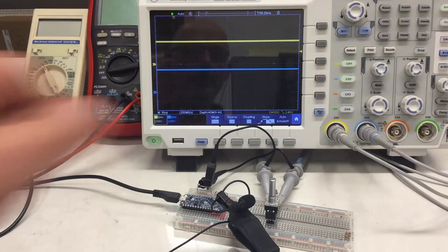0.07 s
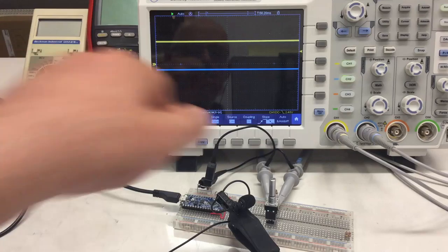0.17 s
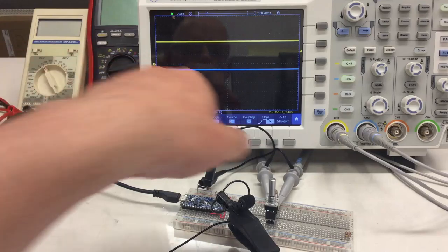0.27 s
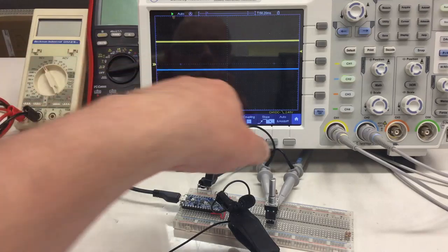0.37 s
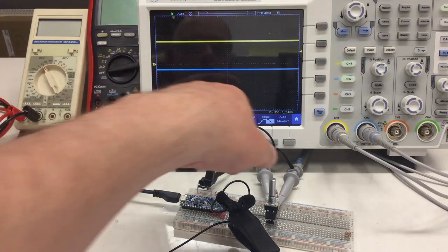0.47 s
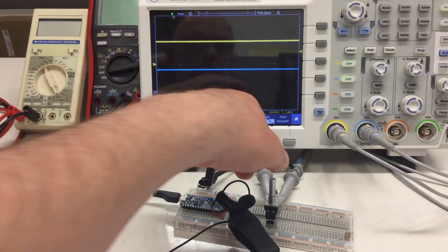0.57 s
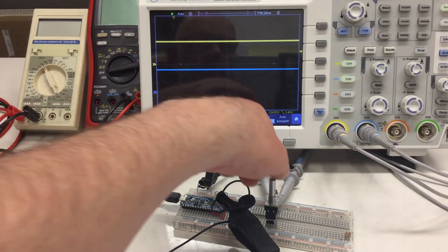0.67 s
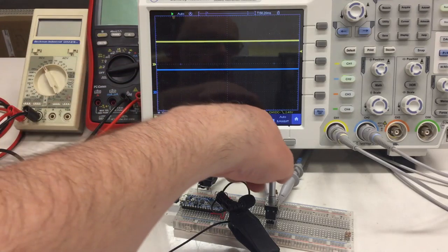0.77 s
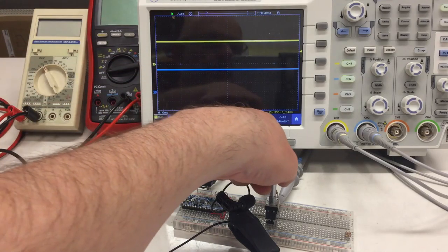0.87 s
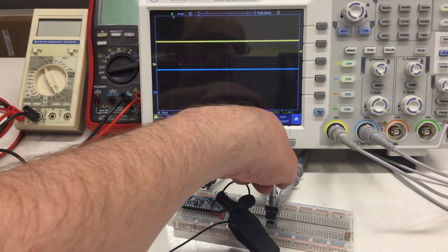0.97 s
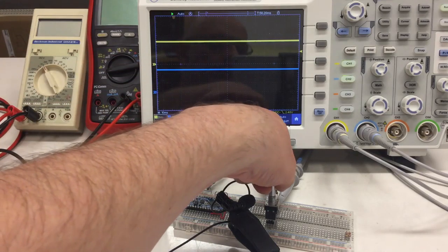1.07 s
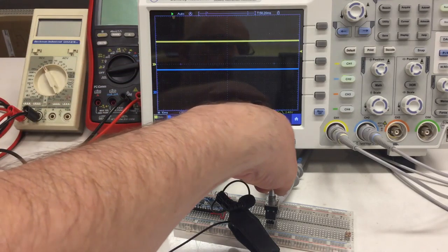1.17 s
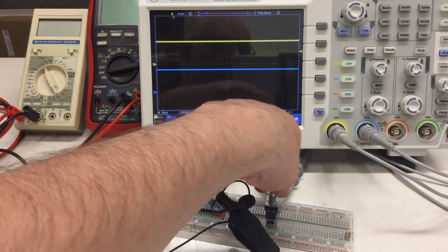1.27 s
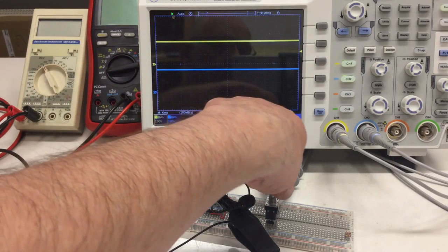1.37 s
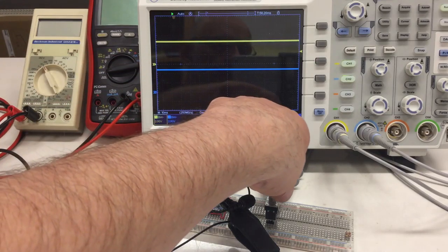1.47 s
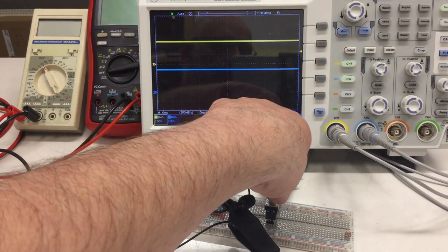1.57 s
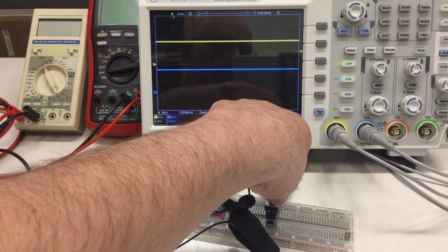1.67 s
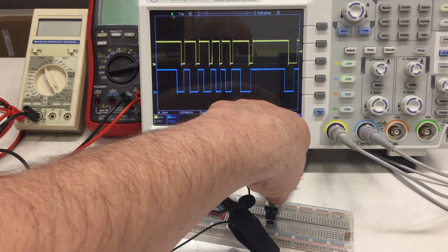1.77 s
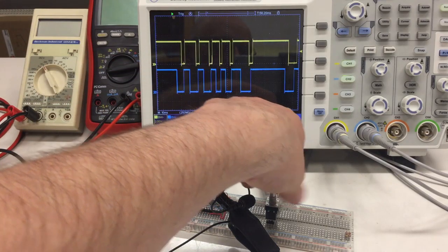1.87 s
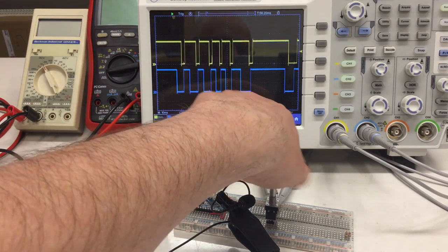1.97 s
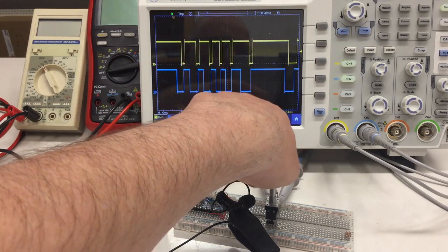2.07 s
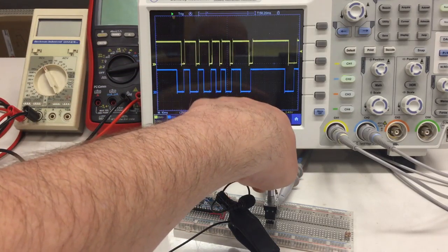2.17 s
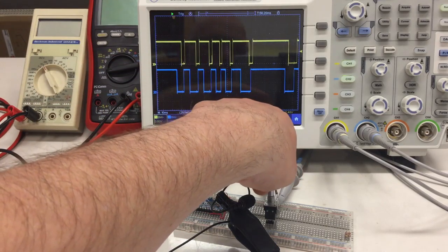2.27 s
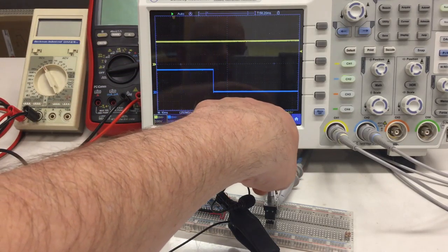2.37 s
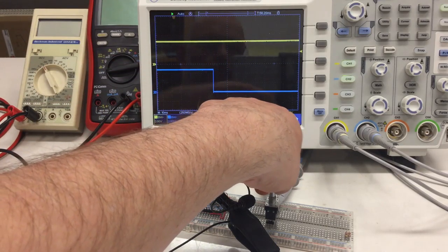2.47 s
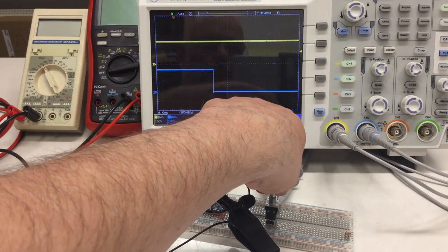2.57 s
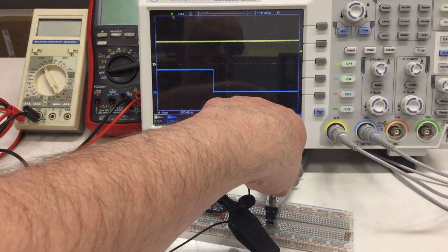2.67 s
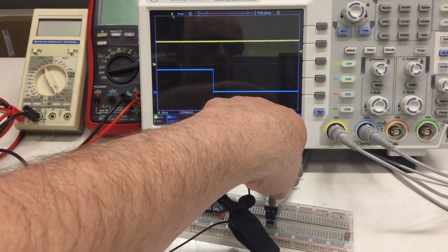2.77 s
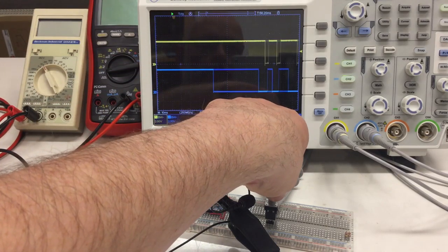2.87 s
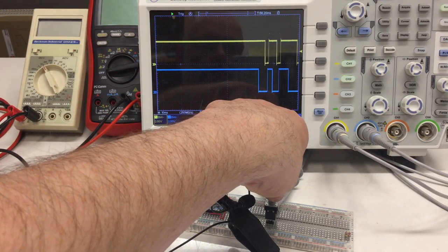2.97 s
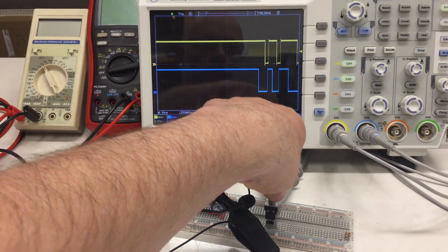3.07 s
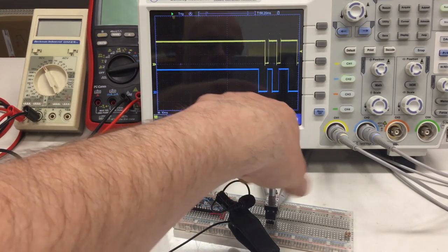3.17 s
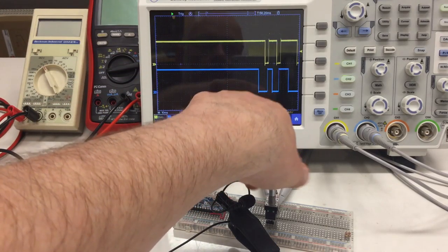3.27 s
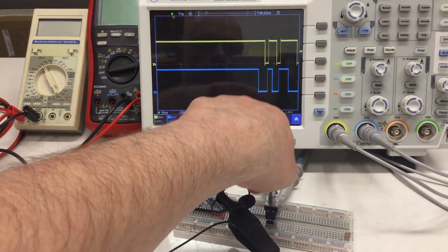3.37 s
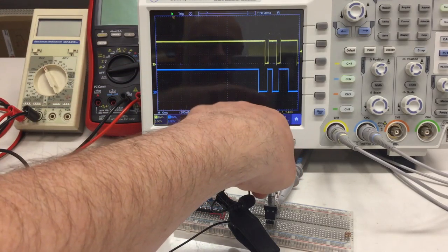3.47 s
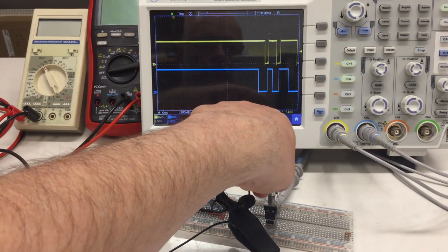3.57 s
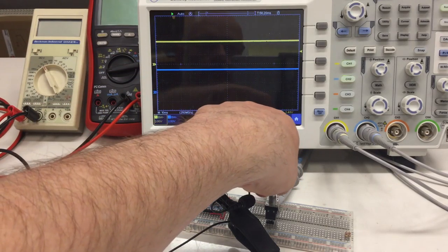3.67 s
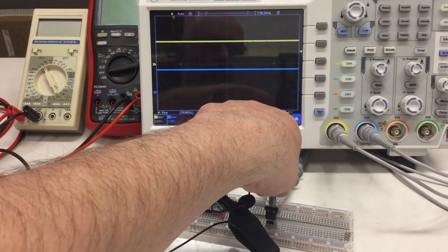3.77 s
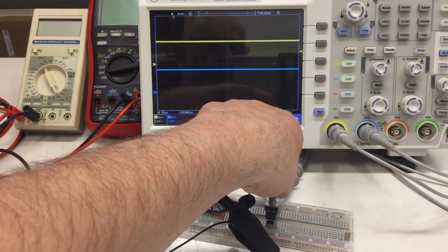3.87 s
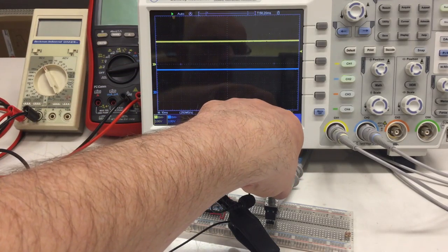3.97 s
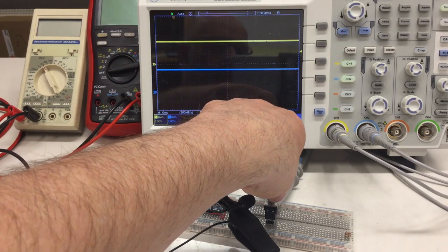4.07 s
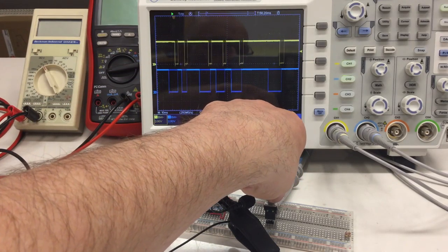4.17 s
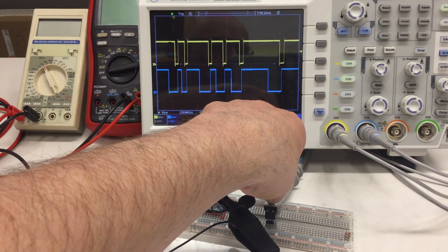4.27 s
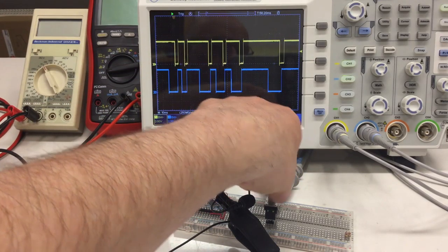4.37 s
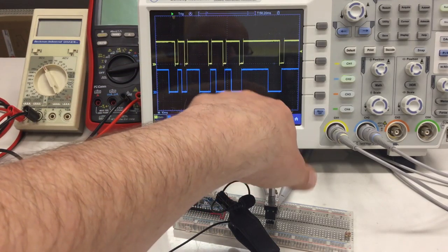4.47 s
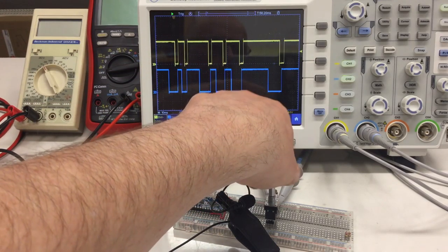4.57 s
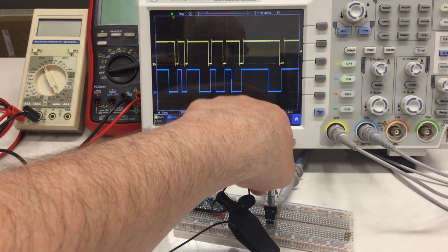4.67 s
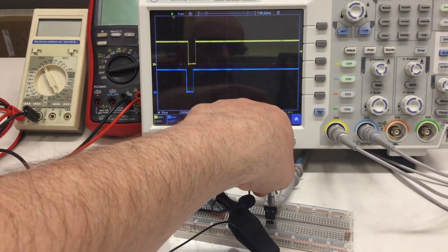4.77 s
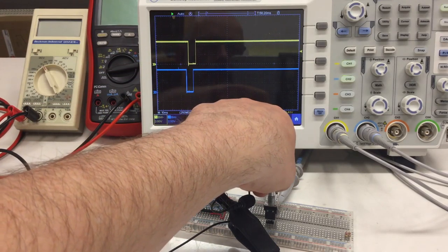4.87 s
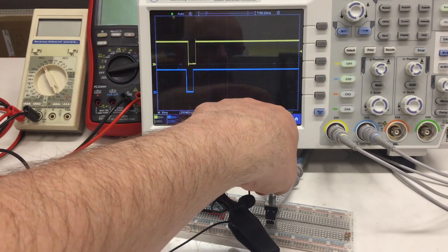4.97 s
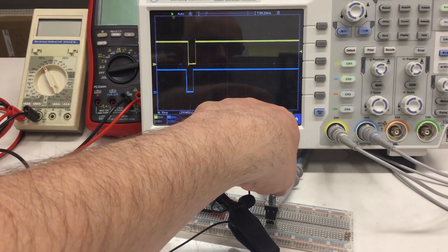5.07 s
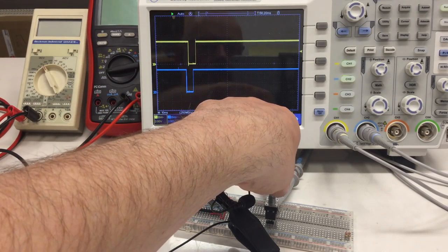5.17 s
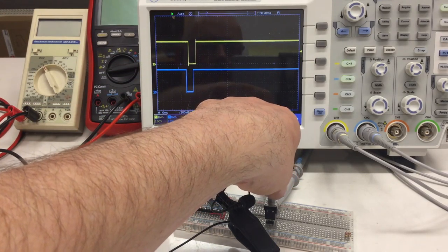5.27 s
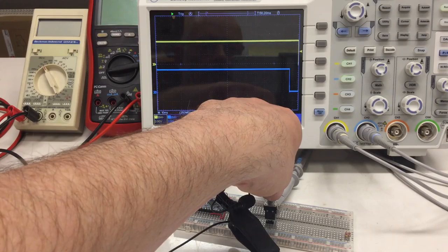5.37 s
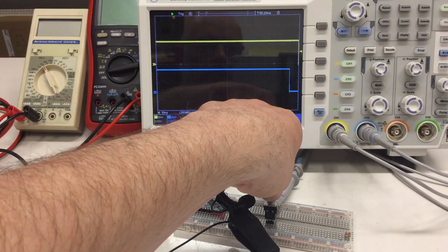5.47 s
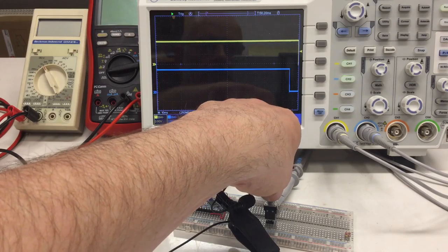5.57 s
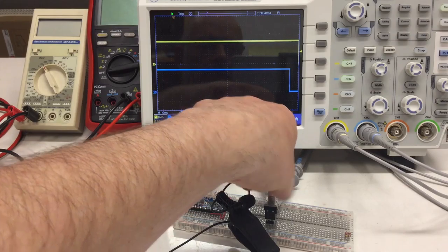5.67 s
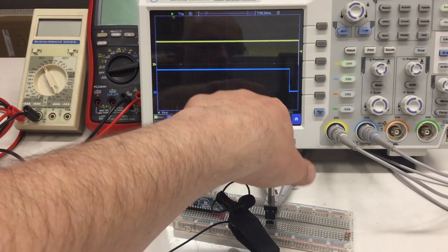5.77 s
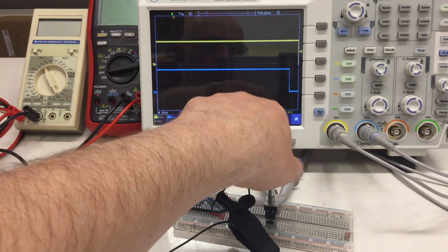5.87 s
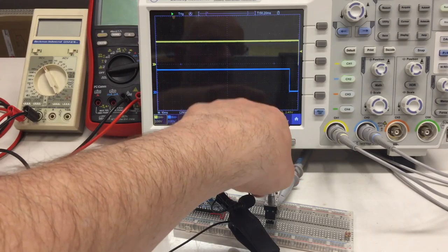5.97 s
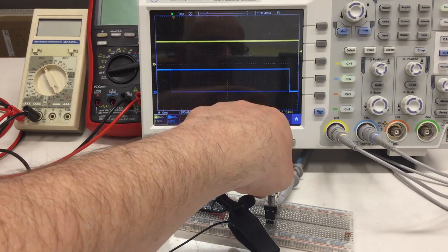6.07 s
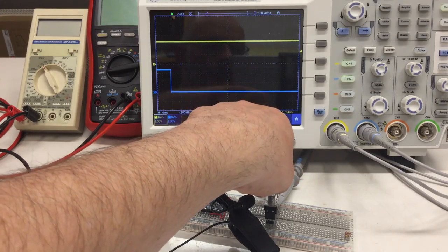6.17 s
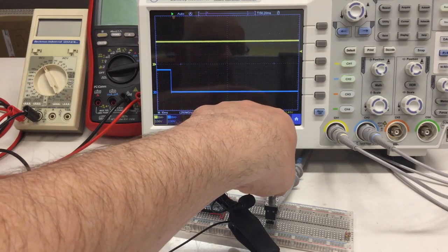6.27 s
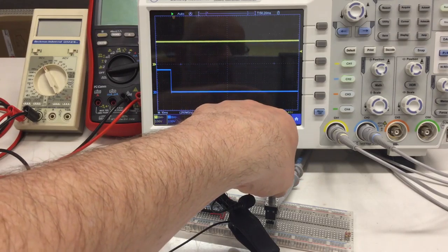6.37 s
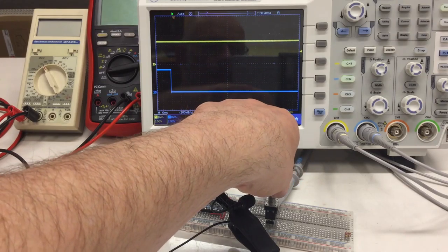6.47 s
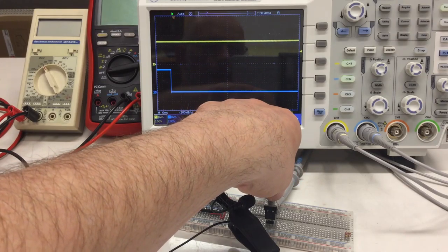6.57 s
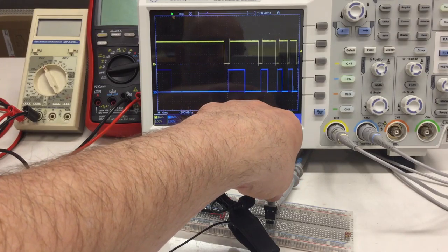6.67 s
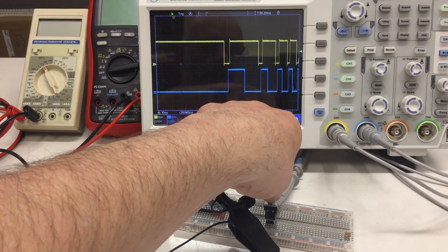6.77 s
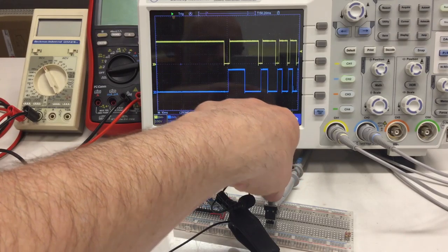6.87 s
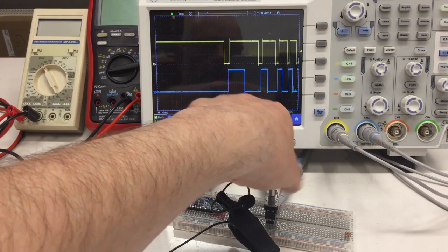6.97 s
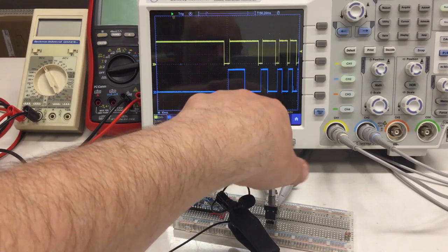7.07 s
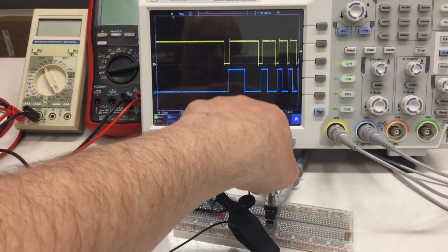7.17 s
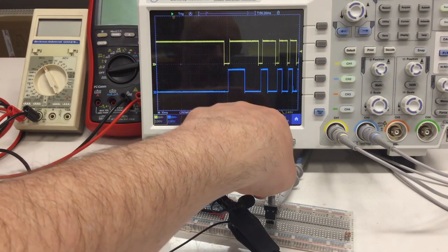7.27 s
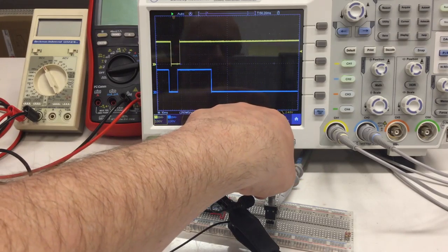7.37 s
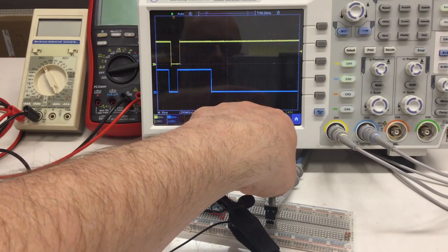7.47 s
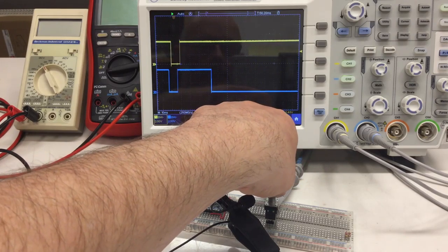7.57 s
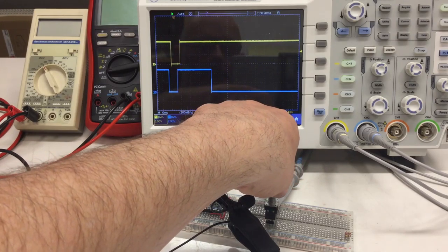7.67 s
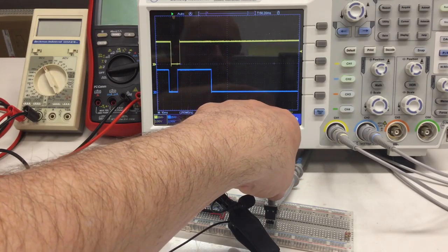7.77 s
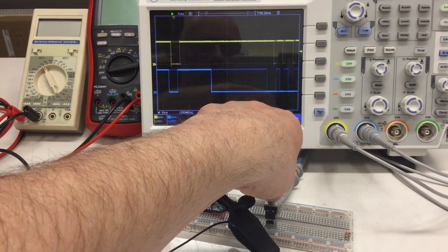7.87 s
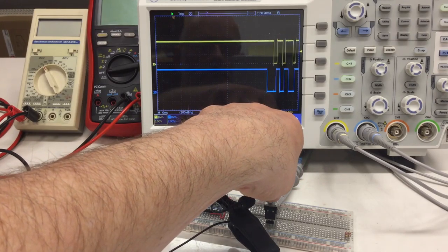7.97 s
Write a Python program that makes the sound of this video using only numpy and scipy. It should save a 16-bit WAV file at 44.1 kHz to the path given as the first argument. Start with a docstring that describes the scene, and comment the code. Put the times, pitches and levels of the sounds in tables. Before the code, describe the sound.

Close up on a workbench, a faint fan hum and hiss are heard alone for about a second. Then fingers turn a small rotary knob again and again, its crisp plastic clicks gathering into fast ratcheting runs and thinning to single ticks, with short pauses between. The microphone shares the bench and picks up small jolts, soft finger bumps and a slight low rumble from the hand.

```python
"""A small detented knob on a breadboard, twisted by hand; the microphone shares the bench.
At each detent a spring snaps into its notch: a short plastic click and a jolt of the bench.
Fingers land, rub and let go, and the tremor of the hand adds a low rumble.
Behind it, an instrument fan whines over mains hum and room hiss."""
import sys
import numpy as np
from scipy import signal
from scipy.fft import rfft, irfft
from scipy.io import wavfile
from scipy.ndimage import uniform_filter1d

SR = 44100
rng = np.random.default_rng(int(sys.argv[2]) if len(sys.argv) > 2 else 0)


def bounce(signal):
    """Save signal as a 16-bit WAV file at the path given by the first command-line argument."""
    frames = np.transpose(np.atleast_2d(signal))
    limited = np.clip(frames, -1, 1)
    pcm = np.round(limited * 32767).astype(np.int16)
    wavfile.write(sys.argv[1], SR, pcm)


N = 353726

# detent snaps: time_s, click_db (relative)
DETENTS = [(1.148, -20.5), (1.164, -24.5), (1.1773, -20.5), (1.188, -21), (1.2, -26.0), (1.2214, -30.5),
           (1.268, -28.5), (1.313, -26), (1.359, -23), (1.4007, -23.5), (1.4355, -26.0), (1.4624, -22.5),
           (1.4815, -26.0), (1.496, -20.5), (1.5098, -19), (1.5237, -19), (1.533, -21.5), (1.5415, -15),
           (1.5475, -12), (1.5523, -12), (1.5587, -19.5), (1.597, -20), (1.695, -22), (1.8834, -28.5),
           (2.4102, -21), (2.4224, -23.5), (2.4427, -27), (2.4522, -20.5), (2.4622, -23), (2.4741, -27),
           (2.4936, -26.5), (2.5989, -31), (2.6588, -30.0), (2.711, -30.5), (2.7626, -26.5),
           (2.7952, -19.5), (2.8045, -18.5), (2.8095, -11), (2.814, -10.0), (2.8178, -9.5), (2.8219, -14),
           (2.8252, -14.0), (2.8273, -11), (2.8304, -8.5), (2.8342, -14.5), (2.8593, -21.5), (2.969, -23),
           (3.613, -21.5), (3.6237, -21.5), (3.6491, -24), (3.6647, -22.5), (3.6821, -27), (3.725, -29),
           (3.7691, -22.5), (3.8017, -25), (3.857, -24.5), (3.9001, -22.5), (3.9369, -22), (3.9751, -22.5),
           (4.0163, -19), (4.0313, -24), (4.0402, -17.5), (4.0464, -19), (4.0513, -15.5), (4.0582, -16.5),
           (4.066, -16), (4.0756, -19), (4.0852, -21.5), (4.1023, -19), (4.151, -22), (4.222, -21.5),
           (4.917, -21), (4.9298, -23), (4.9484, -23.5), (4.9575, -23), (4.9663, -20.5), (4.975, -23),
           (4.9901, -25.5), (5.0488, -33.5), (5.1213, -24), (5.169, -19.0), (5.2163, -24.5),
           (5.2543, -22.5), (5.2878, -16.5), (5.298, -19), (5.305, -15), (5.3102, -12), (5.3161, -18.5),
           (5.323, -22), (5.3328, -23), (5.3448, -13), (5.3549, -21), (5.371, -15.5), (5.4039, -18),
           (5.469, -21), (6.1638, -23), (6.1981, -23.0), (6.2157, -26), (6.227, -20), (6.2362, -25),
           (6.248, -24), (6.2674, -22.5), (6.302, -26), (6.375, -25), (6.4179, -18.5), (6.472, -22.5),
           (6.5129, -20), (6.5445, -18.5), (6.558, -18), (6.565, -18), (6.571, -14), (6.5772, -15),
           (6.5847, -20), (6.5948, -23), (6.6044, -16), (6.614, -28), (6.6287, -19.0), (6.662, -20.5),
           (6.739, -22), (6.933, -30.0), (7.4287, -20.5), (7.4367, -21), (7.448, -24.5), (7.461, -18.5),
           (7.469, -21.5), (7.4781, -20.5), (7.491, -22), (7.5266, -27.5), (7.601, -24), (7.6589, -22),
           (7.702, -23.0), (7.7305, -19), (7.7485, -16.5), (7.7578, -14), (7.7642, -13), (7.771, -10.5),
           (7.7819, -15.5), (7.7969, -15.0), (7.8208, -19.5), (7.8553, -19), (7.8836, -21.5),
           (7.9105, -20.5), (7.9377, -20.5), (7.9794, -22)]


def clicks(detents):
    """The spring scrapes over the crest, drops in and rings the knob; a hard landing adds a dry crack."""
    # knob modes: freq_hz, level_db, t60_s
    knob_modes = [(2970, -8.5, 0.0054), (3520, -6.5, 0.0012), (3670, 6, 0.0043), (4440, -1, 0.0028),
                  (5250, 0.5, 0.0056), (6050, -3, 0.0042), (7600, -7, 0.0025)]
    lead_s, tilt_per_octave, neutral_crack_db = .002, 0.34, -19.5
    out, t = np.zeros(N), np.arange(int(.02 * SR)) / SR
    hit = int(lead_s * SR)
    plastic = signal.butter(2, [2200, 8000], "band", fs=SR, output="sos")
    treble = signal.butter(1, [4000, 15000], "band", fs=SR, output="sos")
    scrape_env = np.exp(-np.abs(t - lead_s) / np.where(t < lead_s, .0006, .0009))
    for time_s, click_db, crack_db, *_ in detents:
        blow = 0.33 * rng.standard_normal(len(t)) * scrape_env
        blow[hit] += 1
        modes = np.array(knob_modes)
        octaves = np.log2(modes[:, 0] / modes[0, 0])
        modes[:, 1] += tilt_per_octave * (crack_db - neutral_crack_db) * octaves  # harder is brighter
        knob = ring(modes, t, spread_db=1.5, detune=.012)
        body = signal.sosfilt(plastic, signal.fftconvolve(blow, knob)[:len(t)])
        landing = .15 * rng.standard_normal(len(t)) * np.exp(-np.abs(t - lead_s) / .0005)
        landing[hit] -= 1
        crack = signal.sosfilt(treble, signal.sosfilt(treble, landing))
        snap = body / np.linalg.norm(body) + amp(crack_db) * crack / np.linalg.norm(crack)
        add(out, time_s - lead_s, amp(click_db + 11) * snap / np.linalg.norm(snap))
    return out


def twists():
    """The hand pushes, then brakes; knob speed sets each detent's crack, signed jolt and rebound."""
    # twists: start_s, brake_s, push_gain, brake_gain, rebound_gain, half_force_gap_s, crack_offset_db
    turns = [(1.14, 1.24, 0.064, .1, 0.24, 0.021, 3), (1.25, 1.537, 0.094, .17, 0.21, 0.026, 6),
             (2.4, 2.54, 0.077, .1, 0.11, .03, 9), (2.55, 2.807, 0.063, .15, 0.24, 0.031, 4),
             (3.6, 3.74, 0.13, .1, 0.25, 0.033, 7), (3.75, 4.038, 0.095, 0.2, 0.13, 0.03, 2.5),
             (4.9, 5.08, 0.14, .1, 0.15, 0.023, 4), (5.1, 5.302, 0.087, 0.22, 0.21, 0.035, 4.5),
             (6.15, 6.33, 0.14, .1, 0.15, 0.038, 3), (6.35, 6.557, 0.082, 0.2, .19, 0.032, 2.5),
             (7.42, 7.55, 0.13, .1, 0.21, 0.026, 8.5), (7.62, 7.761, 0.16, .24, 0.21, 0.029, 1.5)]
    turnover_s, hurried_gap_s = 0.019, 0.0056
    pushing_db, fade_db_per_octave, onset_detents = -19.5, 11, 1.37
    time_s, click_db = np.transpose(DETENTS)
    turns = np.array(turns)
    turn_index = np.maximum(np.searchsorted(turns[:, 0], time_s) - 1, 0)
    _, brake_s, push_gain, brake_gain, rebound_gain, half_gap_s, offset_db = turns[turn_index].T
    before_s, after_s = np.diff(time_s, prepend=0), np.diff(time_s, append=N / SR)
    gap_s, braking = np.minimum(before_s, after_s), time_s > brake_s
    force = 1 / (1 + (gap_s / half_gap_s) ** 3.3)
    scatter = rng.standard_normal((len(time_s), 3)).T
    # the crack grows over the first braked detents and fades as the knob slows
    braked_count = np.maximum(np.arange(len(time_s)) + 1 - np.searchsorted(time_s, brake_s), 0)
    slow_octaves = np.log2(np.maximum(after_s / (0.47 * half_gap_s), 1))
    braking_db = -1 - fade_db_per_octave * slow_octaves - 30 * np.exp(-braked_count / onset_detents)
    crack_db = offset_db + np.where(braking, braking_db, pushing_db) + 2.5 * scatter[0]
    turnover_dip = 1 - 0.72 * np.exp(-np.abs(time_s - brake_s) / turnover_s)
    jolt = np.where(braking, -brake_gain, push_gain) * turnover_dip * force * amp(2.0 * scatter[1])
    recovery = 1 / (1 + (hurried_gap_s / gap_s) ** 4)  # close detents leave no time to rebound
    rebound = rebound_gain * force * recovery * amp(3.25 * scatter[2])
    return np.transpose([time_s, click_db, crack_db, jolt, rebound])


def jolts(detents):
    """The spring winds up, then kicks; the board rings, the bench rebounds and loose wires buzz."""
    # bench modes: freq_hz, weight, decay_s, swell_s
    bench_modes = [(118.3, -1.73, 0.0049, 0.0065), (207.7, 0.27, 0.018, 0.00062)]
    # breadboard modes: freq_hz, level_db, t60_s
    board_modes = [(316, -9, 0.028), (454, -11.5, 0.02), (628, -8.5, 0.0098), (1058, -6.5, 0.0098)]
    lead_s, windup_s, kick_s, buzz_s = .015, .003, 0.0012, 0.004
    pushing, braking, buzz = np.zeros((3, N))
    t = np.arange(int(.06 * SR)) / SR - lead_s
    age_s = np.maximum(t, 0)
    windup = .45 * np.exp(-np.abs(t) / np.where(t < 0, windup_s, .0005))
    kick = age_s / kick_s * np.exp(1 - age_s / kick_s) - windup
    sway = sum(weight * np.sin(2 * np.pi * hz * age_s)
               * (1 - np.exp(-age_s / swell_s)) * np.exp(-age_s / decay_s)
               for hz, weight, decay_s, swell_s in bench_modes)
    for time_s, click_db, _, jolt, rebound in detents:
        board = ring(board_modes, age_s, spread_db=2.0, detune=.04)
        add(pushing if jolt > 0 else braking, time_s - lead_s, jolt * (kick + board) + rebound * sway)
        burst = rng.standard_normal(len(t)) * age_s * np.exp(-age_s / buzz_s)
        add(buzz, time_s - lead_s, (amp(click_db) + 0.15 * rebound) * burst)
    # jolts into the finger pad come out rounder
    sharp, padded = (signal.butter(2, hz, fs=SR, output="sos") for hz in (2200, 1000))
    wires = signal.butter(2, [700, 1700], "band", fs=SR, output="sos")
    knocks = signal.sosfilt(sharp, braking) + signal.sosfilt(padded, pushing)
    return knocks + amp(50.0) * signal.sosfilt(wires, buzz)


def touches():
    """A fingertip lands or lets go: a soft push wobbles the bench and rattles the board."""
    # finger contacts: time_s, peak_db, push_s, ring_hz, decay_s, rattle_db (re thump)
    contacts = [(1.887, -20.5, 0.0033, 60.5, 0.0026, -14), (2.962, -29, 0.0028, 60., 0.0065, -12),
                (3.158, -18.5, 0.0012, 81, 0.0048, -19), (4.417, -20.5, 0.0014, 50.6, 0.0022, -22),
                (5.704, -18.5, 0.0023, 60.7, 0.0046, -17), (6.954, -22, 0.0029, 60., 0.005, -25),
                (7.591, -12, 0.00072, 247, 0.0026, -26), (7.601, -11, 0.00067, 150., 0.0035, -12),
                (7.604, -23, 0.0014, 322, 0.014, 3)]
    out, t = np.zeros(N), np.arange(int(.08 * SR)) / SR
    mid = signal.butter(3, [500, 1800], "band", fs=SR, output="sos")
    for time_s, peak_db, push_s, ring_hz, decay_s, rattle_db in contacts:
        wobble = np.cos(2 * np.pi * ring_hz * t) * np.exp(-t / decay_s)
        thump = -np.convolve(wobble, np.hanning(int(push_s * SR) + 3))
        rattle = signal.sosfilt(mid, rng.standard_normal(len(t)) * np.exp(-t / 0.011))
        add(out, time_s - push_s / 2, amp(peak_db) * thump / np.abs(thump).max())
        add(out, time_s, amp(peak_db + rattle_db) * rattle / np.abs(rattle).max())
    return out


def rubs():
    """Skin sticks and slips on the knob: dense, uneven grains with a flickering level."""
    # finger slides: start_s, length_s, level_db
    slides = [(3.447, 0.016, -26.5), (6.007, 0.046, -32.5), (6.06, 0.038, -32), (7.257, 0.056, -33)]
    # friction spectrum: freq_hz, density_db
    spectrum = [(500, -18), (1000, -22.5), (2000, -16.5), (3000, -25.5), (3700, -14.5), (6200, -14.5),
                (11600, -22.5), (15000, -41)]
    attack_s, release_s = 0.0029, 0.0023
    t = np.arange(N) / SR
    grains = rng.standard_normal(N) * amp(6.9 * np.minimum(rng.exponential(size=N), 4) + 4.0 * walk(250))
    envelope = sum(amp(level_db) * np.clip((t - start_s) / attack_s, 0, 1)
                   * np.exp(-np.maximum(t - start_s - length_s, 0) / release_s)
                   for start_s, length_s, level_db in slides)
    return level(coloured(grains, spectrum), 0) * envelope


def tremor():
    """Low rumble from the shaking hand, stronger while detents go by."""
    rest_db, twist_db, spread_s = -42, -32.5, 0.12
    ticks = np.zeros(N)
    ticks[(np.transpose(DETENTS)[0] * SR).astype(int)] = 1
    activity = signal.fftconvolve(ticks, np.hanning(int(2 * spread_s * SR)), "same")
    envelope = amp(rest_db) + amp(twist_db) * np.tanh(activity / 6)
    rumble = coloured(rng.standard_normal(N), [(4, -28), (12, 20.5), (28, 1), (55, -2), (150, -47.0)])
    return level(rumble, 0) * envelope * amp(1.2 * walk(3.2))


def fan():
    """Shaft tone and blade whine waver with the fan speed; the shaft tone fades."""
    # shaft tone envelope: time_s, peak_db
    shaft_levels = [(0, -41), (1, -43.5), (2.3, -40), (3.4, -41), (3.7, -39.5), (8.1, -58)]
    # blade whine: shaft_harmonic, level_db
    harmonics = [(5, -55), (9, -50), (11, -46.5), (13, -63), (22, -62), (28, -56), (32, -56), (36, -61.5),
                 (41, -65), (48, -66.5), (52, -69)]
    shaft_hz = 45.46
    phase = 2 * np.pi * np.cumsum(shaft_hz * (1 + 0.00114 * walk(2.8))) / SR
    shaft_db = np.interp(np.arange(N) / SR, *np.transpose(shaft_levels))
    out = amp(shaft_db) * np.sin(phase)
    for k, level_db in harmonics:
        out += amp(level_db + 1 + 0.62 * walk(3.9)) * np.sin(k * phase + rng.uniform(0, 2 * np.pi))
    return out


def hum():
    """Mains hum and faint whines, wandering in level and pitch."""
    # tones: pitch_hz, level_db, wander_hz
    tones = [(119.6, -51.5, 2.07), (196.3, -53, 10.77), (3955, -64.5, 40.), (6420, -71, 170),
             (7750, -74, 100.)]
    out = np.zeros(N)
    for pitch_hz, level_db, wander_hz in tones:
        gain = amp(level_db + 1 + 2.0 * walk(7.9))
        out += gain * np.sin(2 * np.pi * np.cumsum(pitch_hz + wander_hz * walk(150)) / SR)
    return out


def hiss():
    """Near-steady air noise in the room."""
    # air spectrum: freq_hz, density_db
    spectrum = [(24, -35), (40, -0.5), (160, -9.5), (206, -8), (265, -11), (497, -7), (550, -11.5),
                (763, -17), (1260, -16), (1360, -22.5), (1470, -15.5), (1750, -23), (11600, -33.5),
                (15300, -34.5), (16500, -63)]
    return level(coloured(rng.standard_normal(N), spectrum), rms_db=-46) * amp(0.11 * walk(4.85))


def room(airborne):
    """Reflections as a short noise tail."""
    t60_s, delay_s, wet_db = .12, .002, -13
    t = np.arange(int(.4 * SR)) / SR
    tail = coloured(rng.standard_normal(len(t)), [(1500, 18.8), (5000, 9.0), (12000, 15.3)])
    tail *= 1000. ** (-t / t60_s) * (t > delay_s)
    return amp(wet_db) * signal.fftconvolve(airborne, tail / np.linalg.norm(tail))[:N]


def ring(modes, t, spread_db, detune):
    """Decaying modes, scattered in level and pitch at each blow."""
    hz, db, t60_s = np.transpose(modes)[:, :, None]
    scatter = rng.standard_normal((2, len(modes), 1))
    partials = np.sin(2 * np.pi * hz * (1 + detune * scatter[1]) * t)
    return np.sum(amp(db + spread_db * scatter[0]) * partials * 1000. ** (-t / t60_s), axis=0)


def coloured(x, points):
    """Shape x by (freq_hz, gain_db) points on a log axis."""
    hz, db = np.transpose(points)
    bins_hz = np.fft.rfftfreq(len(x), 1 / SR) + 1
    return irfft(rfft(x) * amp(np.interp(np.log(bins_hz), np.log(hz), db)), len(x))


def walk(rate_hz):
    """Random steps, smoothed twice."""
    hold = int(SR / rate_hz)
    steps = np.repeat(rng.standard_normal(N // hold + 1), hold)
    return uniform_filter1d(uniform_filter1d(steps, hold), hold)[:N]


def amp(db):
    return 10 ** (np.asarray(db) / 20)


def level(x, rms_db):
    return x * amp(rms_db) / np.sqrt(np.mean(x ** 2))


def add(out, start_s, sound):
    i = int(round(start_s * SR))
    out[i:i + len(sound)] += sound[:N - i]


def scene():
    """Mono mix; only the clicks and rubs excite the room."""
    detents = twists()
    airborne = clicks(detents) + rubs()
    return (airborne + room(airborne) + jolts(detents) + touches() + fan() + hum() + hiss() + tremor())[None]


def record(dry):
    """The microphone drops the deepest bass, opens a moment late and cuts the top."""
    low_hz, top_hz, open_s = 8, 15900, .069
    heard = signal.sosfilt(signal.butter(1, low_hz, "high", fs=SR, output="sos"), dry)
    heard *= np.arange(N) > open_s * SR
    return signal.sosfilt(signal.ellip(10, .2, 75, top_hz, fs=SR, output="sos"), heard)


dry = scene()
out = record(dry)
bounce(out)
```